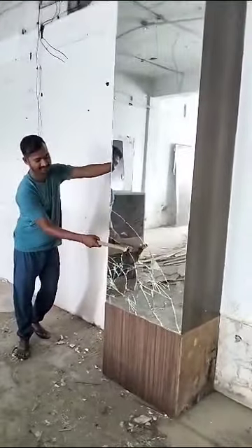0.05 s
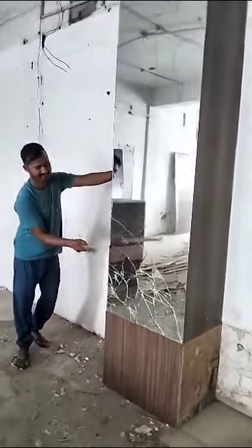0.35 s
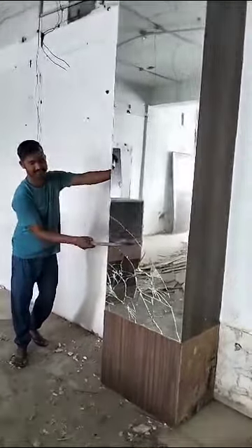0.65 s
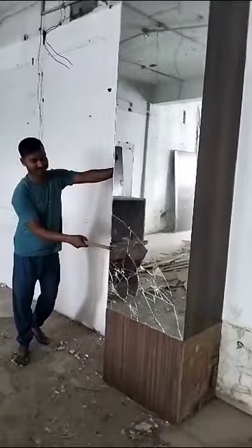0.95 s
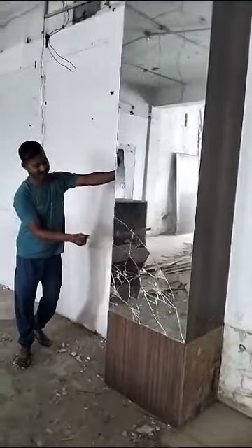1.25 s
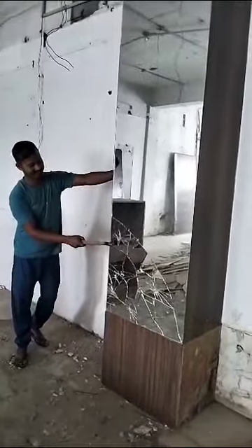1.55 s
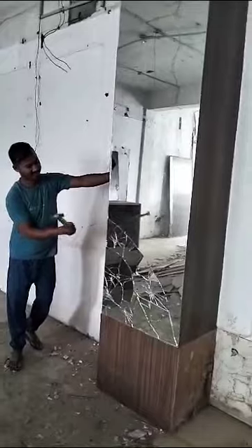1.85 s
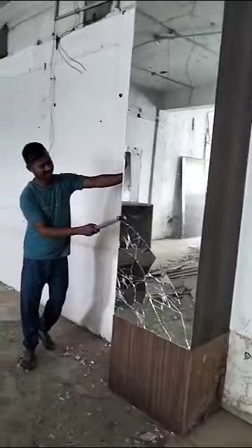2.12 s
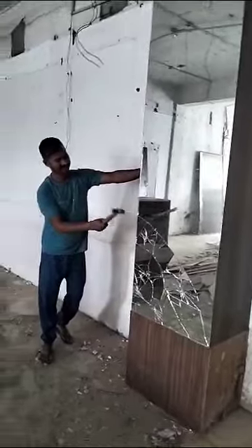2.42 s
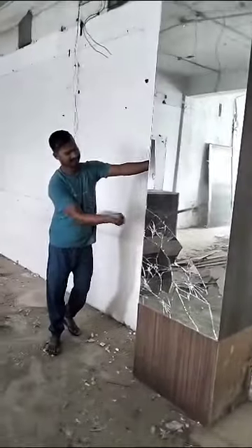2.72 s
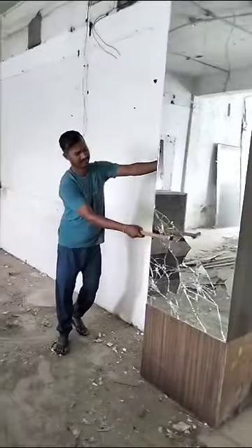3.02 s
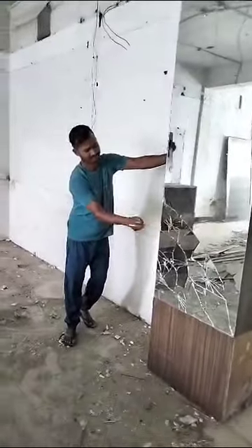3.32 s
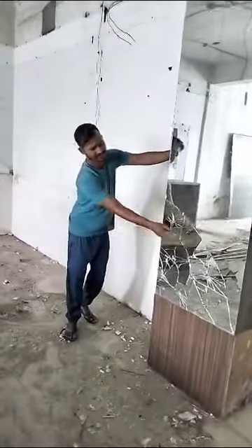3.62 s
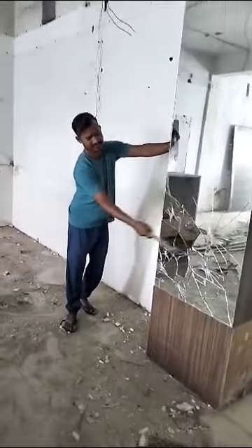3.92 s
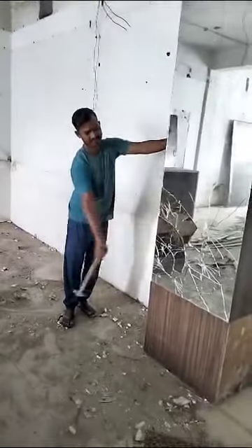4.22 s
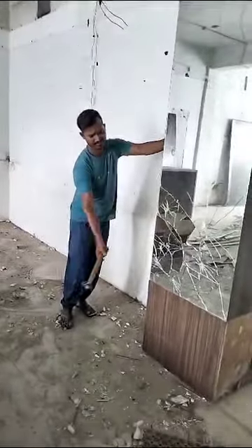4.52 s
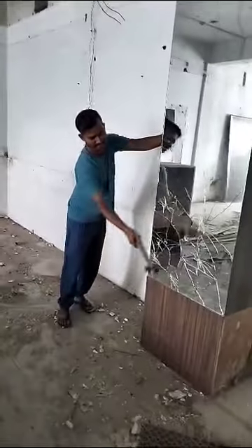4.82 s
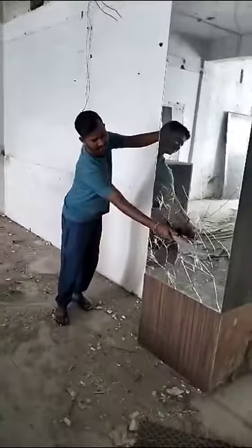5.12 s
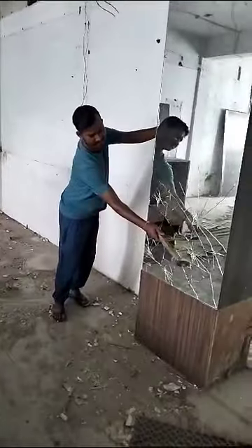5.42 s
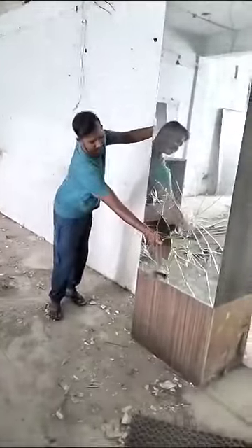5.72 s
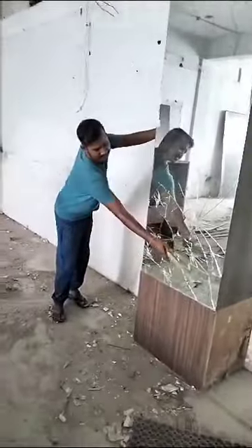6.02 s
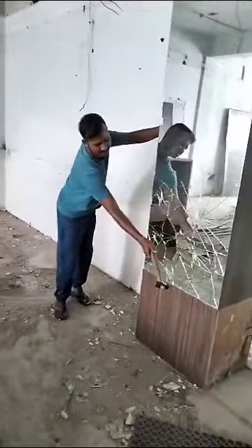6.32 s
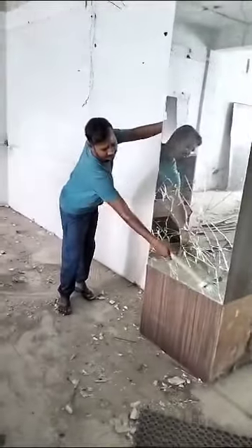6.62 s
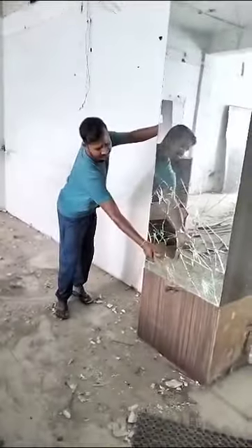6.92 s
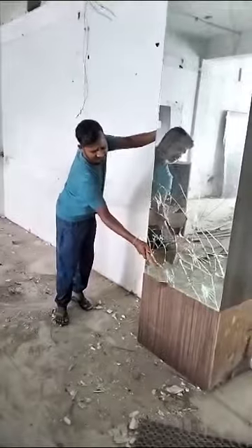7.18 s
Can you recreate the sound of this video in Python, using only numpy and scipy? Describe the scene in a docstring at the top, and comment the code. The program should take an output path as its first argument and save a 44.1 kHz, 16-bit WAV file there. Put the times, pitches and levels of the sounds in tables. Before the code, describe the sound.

Steady hammer blows crack mirror glass on a hollow wooden pillar, each crunch ringing through a bare room as tiny chips fall.

```python
"""Hammer blows crack into a mirror glued to a wood-clad pillar, about every 0.75 s, with one pause.
Each blow shakes the wall, the hollow casing, the backing board and the glass, and splinters crunch.
The loose casing thuds back now and then, and small shards clink down on the floor.
A bare concrete hall rings on for over a second above a low hum, heard in mono from a few metres away."""
import sys
import numpy as np
from scipy import signal
from scipy.fft import rfft, irfft
from scipy.io import wavfile
from scipy.ndimage import uniform_filter1d, minimum_filter1d

SR = 44100
rng = np.random.default_rng(int(sys.argv[2]) if len(sys.argv) > 2 else 0)


def materialize(psi):
    """Save the field psi as 16-bit PCM at rate SR to the path in sys.argv[1].

    A 1-D psi becomes a single channel; in a 2-D psi each row is a channel.
    """
    bounded = np.clip(np.atleast_2d(psi).T, -1, 1)
    quanta = np.round(bounded * 32767).astype(np.int16)
    wavfile.write(sys.argv[1], SR, quanta)


N = 324135
SIZE = 2 * SR  # every hit is built in a two-second buffer
HZ = np.maximum(np.arange(SIZE // 2 + 1) * SR / SIZE, 1)
AGE = np.arange(SIZE) / SR
FADE = np.clip((AGE[-1] - AGE) * 2, 0, 1) ** 2  # eases out its last half second


# The hammer blows. Each row: start in seconds, force in dB, height above the casing in metres,
# glass crush in dB, the struck piece's note in Hz and weight in dB, a freed sliver's in Hz and dB.
BLOW_HITS = [ (-0.19, -22.5, 0.66, 1, 814, -5, 8450, -15.5),
             (0.5499, -22.5, 0.45, 2.5, 4050, -3, 11900, -20),
             (1.258, -24.5, 0.48, 0, 630, -10.5, 11900, -19), (1.9815, -21, 0.55, 0, 1276, -5, 6060, -12),
             (2.7410, -21, 0.49, -2, 850, -11, 11700, -31), (3.5320, -20.5, 0.56, 0, 3100, -3, 12100, -29),
             (5.0090, -26, 0.085, 2.5, 707, -7, 12000, -28), (5.726, -24, 0.3, 5, 1120, -5.5, 11450, -13),
             (6.4474, -21.5, 0.21, -3.5, 824, -4.5, 13300, -25),
             (7.1046, -21.5, 0.047, 2.5, 4300, -3, 11800, -31), ]

def hammer(piece_q=5.6, sliver_width_hz=230):
    """The hammer works down the mirror; each blow shakes all parts and rings one piece and a sliver."""
    out = np.zeros(N)
    for start, force_db, height_m, crush_db, piece_hz, piece_db, sliver_hz, sliver_db in BLOW_HITS:
        parts = struck_parts(height_m, crush_db) * fragments(db=-14.5 + 16 * height_m)
        piece = undb(2 * piece_db) * resonances([(piece_hz, piece_hz / piece_q, 0)])
        sliver = undb(2 * sliver_db) * resonances([(sliver_hz, sliver_width_hz, 0)])
        power = parts + piece + sliver
        contact = crunch(db=-12, spread_s=0.008, above_hz=24000)
        blow = FADE * irfft(ringing(power) * contact * hall())
        add(out, level(blow, force_db + 10 * np.log10(power.sum())), start)
    return out


# The voices of the pillar and mirror, from the wall's boom to the sizzle of splinters.
# Each row: pitch in Hz, width in Hz, level in dB within that part.
WALL_MODES = [(35, 39, -14), (62.6, 14, 7.5), (80, 22, -5.5)]
CASING_MODES = [(111.3, 16, 2.5), (151.7, 33, 1.5), (174.5, 23, 0), (222, 67, 0.5), (283, 110, -2),
                (380, 360, -6.5)]
BOARD_MODES = [(460, 630, 0), (733, 350, 6), (1016, 240, 8), (1255, 360, 7), (1580, 740, 6)]
PANE_MODES = [(1840, 460, -7), (2374, 470, 5.5), (2790, 760, 4), (3010, 330, 6), (3470, 680, 5),
              (5160, 380, -10), (6370, 100, -4.5)]
CRACKED_PLATE_MODES = [(4050, 1100, 0), (4130, 710, 2.5), (4740, 600, -5), (5470, 1100, -4),
                       (6140, 2020, -9)]
LOOSE_FRAGMENT_MODES = [(5400, 120, 0.5), (6140, 180, 2.5), (6850, 130, -2), (8450, 270, -7),
                        (11720, 310, -11.5)]
SPLINTER_MODES = [(6700, 1500, 6), (8450, 320, 1), (9460, 1800, -3.5), (11400, 1300, 1),
                  (13100, 2400, -3.5), (15000, 2100, -12)]

def struck_parts(height_m, crush_db):
    """The power spectrum of a blow: low hits boom in the casing, high ones shake the glass."""
    hollow_note = [(254 - 130 * height_m, 60, 0)]  # higher when the blow lands near the casing
    plate_note = [(4390 - 480 * height_m, 320, 0)]  # falls higher up, where the plates are larger
    mix_db = [
        (WALL_MODES, -12 + 3.5 * height_m - 0.28 * crush_db),  # crushing glass cushions the wall
        (CASING_MODES, 3 - 18 * height_m),
        (hollow_note, -4.5 - 18 * height_m),
        (BOARD_MODES, 0.5 - height_m),
        (PANE_MODES, -4 + 7 * height_m),
        (CRACKED_PLATE_MODES, -4 + 7 * height_m),
        (plate_note, -8.5),
        (LOOSE_FRAGMENT_MODES, -23 + 20.5 * height_m),  # the loosest glass sits high up
        (SPLINTER_MODES, -12.5 + crush_db),
    ]
    return sum(undb(2 * db) * resonances(modes) for modes, db in mix_db)


def fragments(db, spacing_hz=260, width_hz=75, above_hz=2600, count=64):
    """Each fragment has its own narrow modes; they gather the treble power into uneven peaks."""
    offset, strength = rng.random((count, 2)).T
    mode_hz = (np.arange(count) + offset) * spacing_hz
    peaks = np.zeros(len(HZ))
    np.add.at(peaks, np.searchsorted(HZ, mode_hz), strength)
    peaks = smooth(peaks, int(width_hz * SIZE / SR)) * 2 * spacing_hz * SIZE / SR  # average near one
    share = undb(2 * db) / (1 + (above_hz / HZ) ** 4)
    return (1 + share * np.abs(peaks)) / (1 + share)


def crunch(db, spread_s, above_hz, count=40):
    """The spectrum of a contact: one pulse, then tiny bright clicks of glass that thin out."""
    timing, strength = rng.random((count, 2)).T
    click_at = np.minimum(-np.log(1 - timing) * spread_s * SR, SIZE - 1).astype(int)
    clicks = np.bincount(click_at, (2 * strength - 1) ** 3, SIZE)
    share = undb(db) * HZ / np.hypot(HZ, above_hz)
    return (1 + share * rfft(unit(clicks))) / np.sqrt(1 + share ** 2)


# Low slaps of the casing. Each row: start in seconds, pitch in Hz, level in dB.
CASING_SLAPS = [(3.548, 41, -34), (3.545, 161, -28), (5.021, 195, -25.5)]

def casing_thuds(rise_cycles=0.65, rise_s=0.0051, room_db=-5):
    """The loose casing slaps back on the pillar just after a blow: a soft push with a little hall."""
    out, room = np.zeros(N), hall()
    for start, hz, db in CASING_SLAPS:
        swell = AGE / (rise_cycles / hz + rise_s)
        push = swell ** 2 * np.exp(-2 * swell) * np.sin(2 * np.pi * hz * AGE)
        reverb = irfft(rfft(push) * room)
        add(out, level(unit(push) + undb(room_db) * unit(reverb), db), start)
    return out


# Shards landing. Each row: start in seconds, ring pitch in Hz, ring level in dB, tick level in dB.
SHARD_LANDINGS = [ (0.266, 12400, -79.5, -71), (0.356, 12500, -77, -76), (1.797, 14000, -67, -70),
                  (4.052, 12550, -65, -72), (4.628, 3660, -57.5, -69.5), (5.443, 11200, -83, -66),
                  (5.503, 12500, -72, -76), (5.590, 12100, -71, -73), (6.166, 13450, -71, -59.5),
                  (7.037, 11100, -76, -69), ]
# The tick of glass on concrete. Each row: pitch in Hz, width in Hz, relative level in dB.
TICK_MODES = [(6000, 1100, 8.5), (8000, 1300, -9), (12280, 4700, -5)]

def shards(small_hz=12800, small_width_hz=240):
    """A falling chip ticks on the floor, skitters and rings briefly."""
    out, room = np.zeros(N), hall()
    tick = ringing(resonances(TICK_MODES))
    for start, hz, ring_db, tick_db in SHARD_LANDINGS:
        width_hz = small_width_hz * small_hz / hz  # larger, lower shards land flat and die sooner
        ring = ringing(resonances([(hz, width_hz, 0)]))
        skitter = room * crunch(db=-7, spread_s=0.02, above_hz=3000, count=4)
        clink = level(irfft(ring * skitter), ring_db) + level(irfft(tick * skitter), tick_db)
        add(out, FADE * clink, start)
    return out


# The hall's tail. Each row: frequency in Hz, seconds to die away by 60 dB.
HALL_DECAY = [(60, 2.12), (160, 1.41), (420, 1.756), (1100, 1.69), (2900, 1.424), (4500, 1.342),
              (7700, 1.05), (11000, 0.82), (15000, 0.54)]
# Direct sound and first echoes. Each row: delay in seconds, level in dB against the tail.
HALL_PATHS = [(0, -9), (.0026, -7), (.0080, -10.5), (0.0135, -14), (.0230, -13.5), (.0286, -15.5)]

def hall(near_db=-1, near_t60=0.63, build_s=0.004, snap_s=0.0011):
    """The concrete hall's frequency response: direct sound, echoes, a quick near field, a long tail."""
    noise, tail = rfft(rng.standard_normal(SIZE)), 0
    centres = [hz for hz, _ in HALL_DECAY]
    for (_, t60), share in zip(HALL_DECAY, np.eye(len(centres))):
        band = irfft(noise * np.interp(np.log(HZ), np.log(centres), share))
        tail = tail + band * undb(-60 * AGE / t60)
    near = rng.standard_normal(SIZE) * undb(-60 * AGE / near_t60)
    response = (unit(tail) + undb(near_db) * unit(near)) * (1 - np.exp(-AGE / build_s))
    for delay, db in HALL_PATHS:
        # a wide pane radiates from many points, so each path arrives as a short snap
        snap = rng.choice([-1, 1], size=512) * np.exp(-AGE[:512] / snap_s)
        add(response, undb(db) * unit(snap), delay)
    return rfft(response)


# The colour of the room tone. Each row: frequency in Hz, relative level in dB.
RUMBLE_CURVE = [(15, -32.5), (25, -15.5), (110, -8.5), (151, -16.5), (264, -19.5), (403, -26), (498, -25.5),
                (569, -31), (1360, -27.5), (1870, -33), (3830, -35), (14000, -60.5)]

def rumble(db=-48, dull_hz=7500):
    """The building's dull rumble, its level drifting slightly."""
    hz = np.maximum(np.arange(N // 2 + 1) * SR / N, 1)
    curve_hz, curve_db = np.transpose(RUMBLE_CURVE)
    colour = undb(np.interp(np.log(hz), np.log(curve_hz), curve_db))
    rolloff = np.hypot(1, (hz / dull_hz) ** 2)
    air = irfft(rfft(rng.standard_normal(N)) * colour / rolloff, N)
    return air / np.std(air) * undb(db + wander(2.3))


# The hum under everything. Each row: pitch in Hz, level in dB.
HUM_TONES = [(64.6, -68), (107.7, -51)]

def hum(waver_db=3, drift_rad=0.27):
    """Two low tones waver in level and phase."""
    out = np.zeros(N)
    for hz, db in HUM_TONES:
        gain = np.sqrt(2) * undb(db + waver_db * wander(3.5))
        out += gain * np.sin(2 * np.pi * hz * np.arange(N) / SR + drift_rad * wander(2.8))
    return out


def resonances(modes):
    """Power spectrum of a set of steep-sided resonances, summing to one."""
    power = 0
    for hz, width_hz, db in modes:
        detune = (HZ ** 2 - hz ** 2) / (HZ * width_hz * np.sqrt(2))
        power = power + undb(2 * db) / (1 + detune ** 2) ** 2
    return power / power.sum()


def ringing(power):
    """Turns a power spectrum into a causal frequency response: sharp attack, then ring-out."""
    cepstrum = irfft(0.5 * np.log(power / power.max() + 1e-9))
    cepstrum[1:SIZE // 2] *= 2
    cepstrum[SIZE // 2 + 1:] = 0
    return np.exp(rfft(cepstrum))


def wander(rate_hz):
    """A slow random drift with a spread near one."""
    hold = int(SR / rate_hz)
    steps = np.repeat(rng.standard_normal(N // hold + 1), hold)
    return smooth(steps, hold)[:N] * np.sqrt(2)


def smooth(x, size):
    """Rounds off corners with two moving averages."""
    return uniform_filter1d(uniform_filter1d(x, size), size)


def undb(db):
    """Decibels to gain; undb(2 * db) gives power."""
    return 10 ** (np.asarray(db) / 20)


def unit(x):
    """Scales to an energy of one."""
    return x / np.sqrt(np.sum(x ** 2))


def level(x, db):
    """Sets the rms of the first quarter second."""
    return x * undb(db) / np.sqrt(np.mean(x[:SR // 4] ** 2))


def add(out, x, start_s):
    """Mixes x into out from start_s on."""
    start = int(round(start_s * SR))
    lo, hi = max(start, 0), min(start + len(x), len(out))
    out[lo:hi] += x[lo - start:hi - start]


def scene():
    """Blows up front, thuds and shards behind, room tone below; the same in both channels."""
    mono = hammer() + casing_thuds() + shards() + rumble() + hum()
    return np.array([mono, mono])


def record(dry, top_hz=15800, ceiling=0.98):
    """A phone cuts the very top, and its fast limiter holds the peaks under full scale."""
    sound = signal.sosfilt(signal.ellip(10, 0.2, 80, top_hz, fs=SR, output="sos"), dry)
    gain = 1 / np.maximum(np.abs(sound).max(axis=0) / ceiling, 1)
    return sound * smooth(minimum_filter1d(gain, size=33), 17)


dry = scene()
out = record(dry)
materialize(out)
```